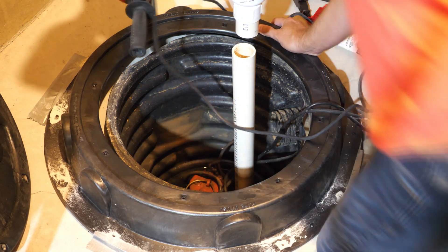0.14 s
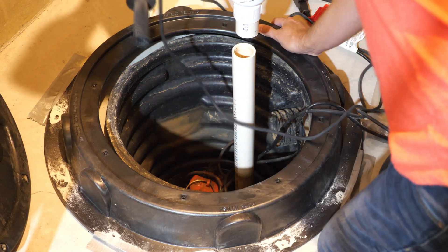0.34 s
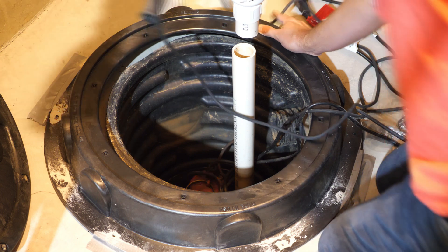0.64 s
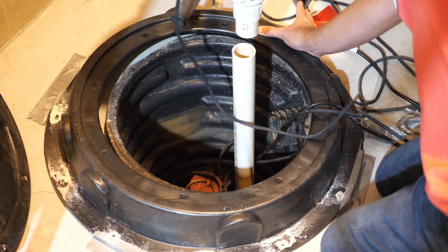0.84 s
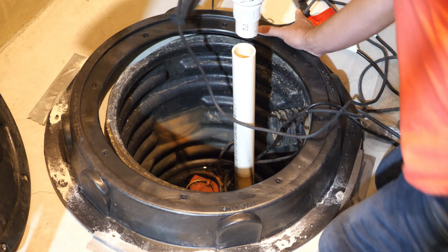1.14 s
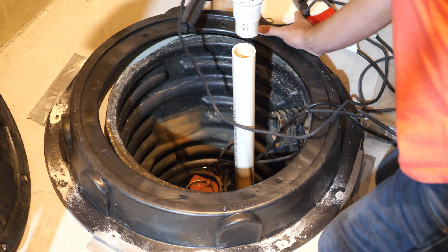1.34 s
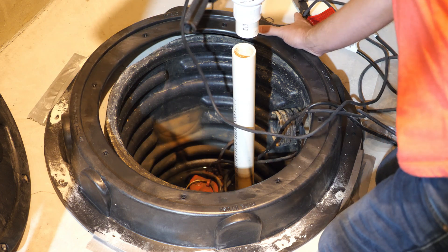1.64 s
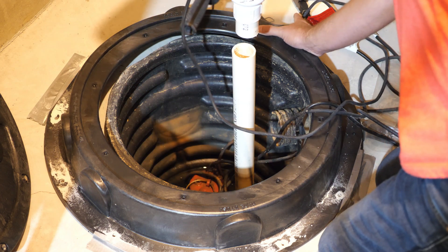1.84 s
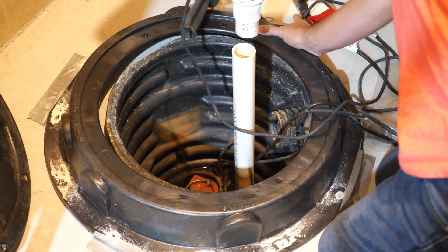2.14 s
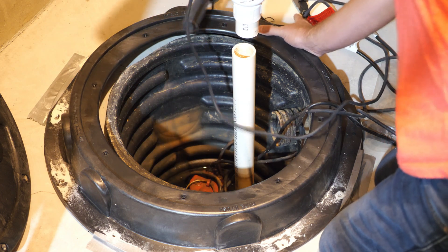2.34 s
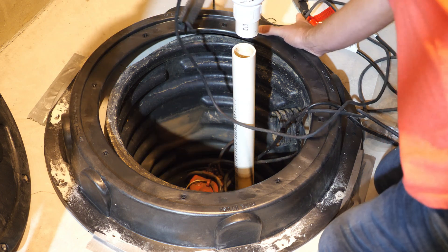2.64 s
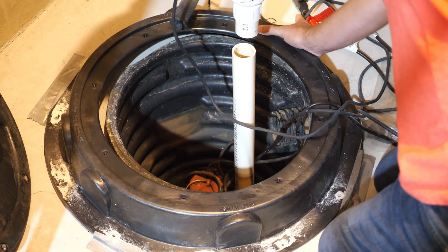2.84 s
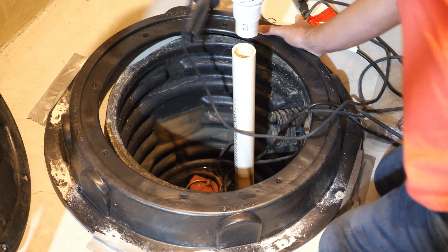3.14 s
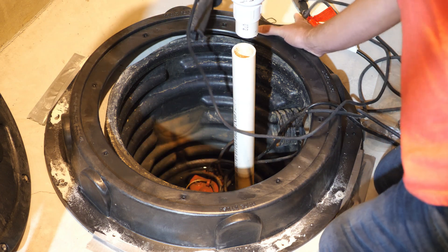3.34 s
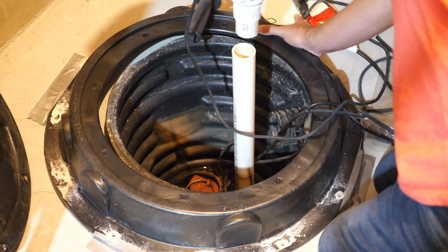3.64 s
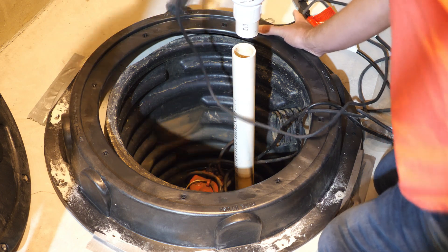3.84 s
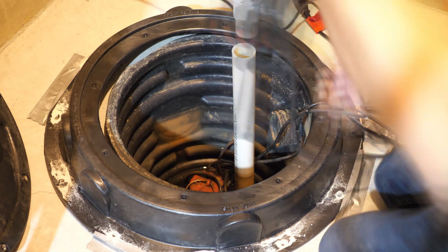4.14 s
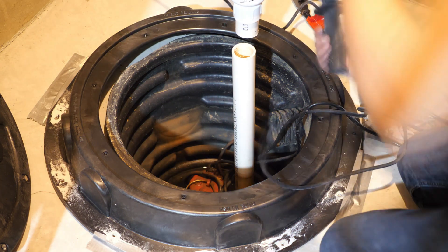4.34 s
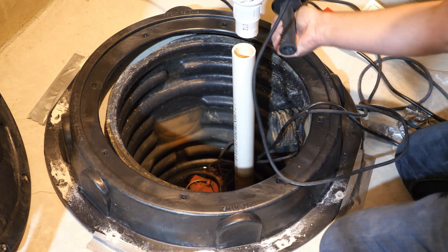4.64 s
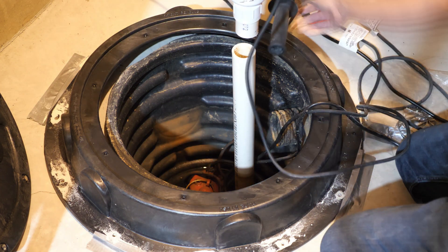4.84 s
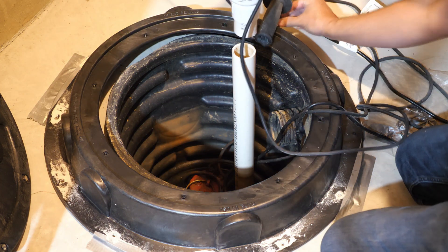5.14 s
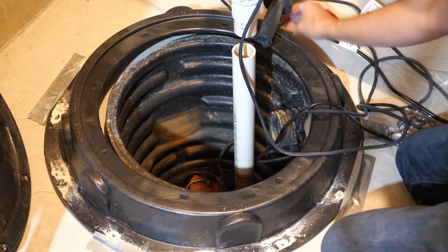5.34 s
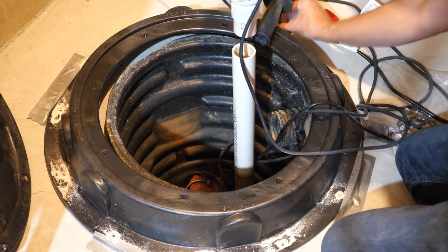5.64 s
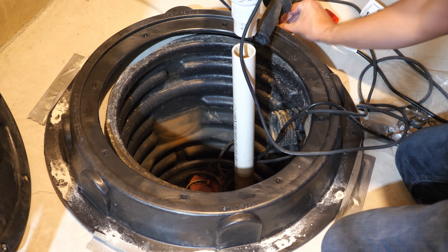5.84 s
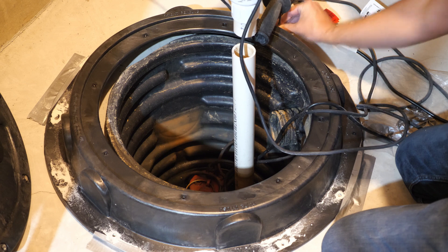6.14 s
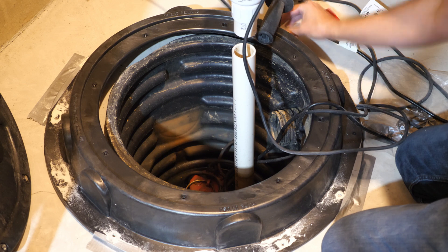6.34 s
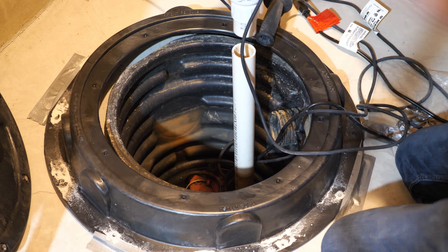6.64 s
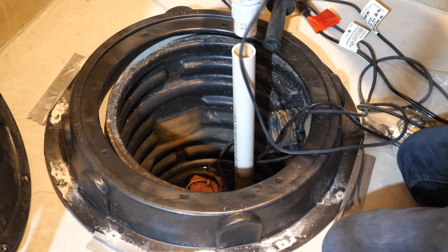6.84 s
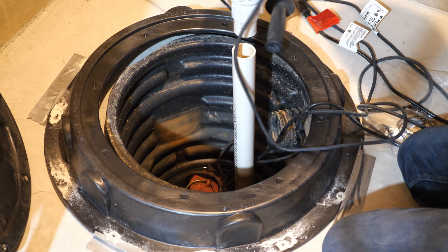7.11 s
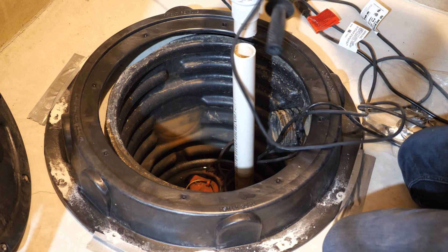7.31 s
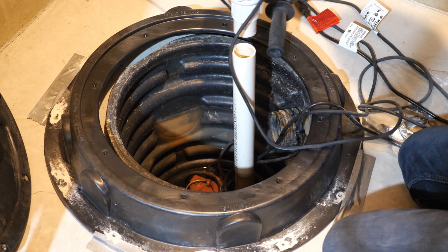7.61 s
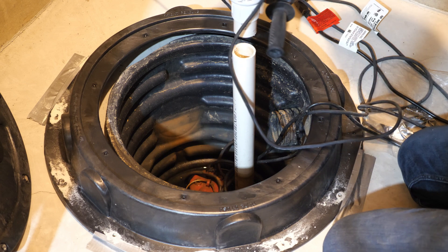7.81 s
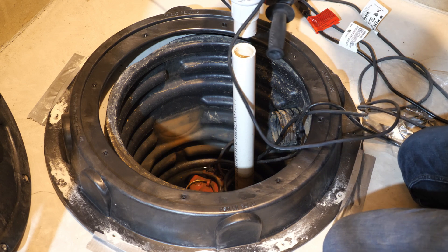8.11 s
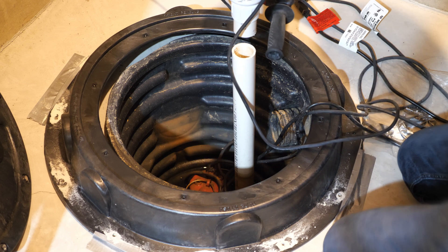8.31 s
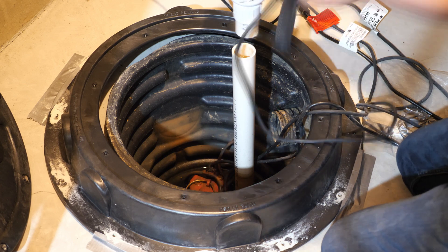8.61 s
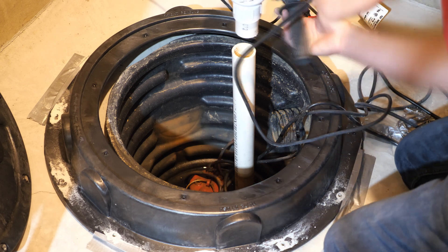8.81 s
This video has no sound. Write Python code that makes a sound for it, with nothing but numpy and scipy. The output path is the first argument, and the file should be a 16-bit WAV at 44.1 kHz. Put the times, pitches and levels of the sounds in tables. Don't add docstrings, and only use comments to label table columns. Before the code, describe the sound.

A hammer drill close by in a small hard basement is already pounding concrete, then lifts, races and whines down. A second steady hammering run follows, then a very brief one ending in a fast free whine. A longer pause holds plastic and cable knocks, rustle, low mains hum and hiss. A final slower, rougher, lower drilling run ends in a coast-down. Close single microphone, short echo.

```python
import sys
import numpy as np
from scipy import signal
from scipy.fft import rfft, irfft, next_fast_len
from scipy.io import wavfile
from scipy.ndimage import uniform_filter1d

SR = 44100
rng = np.random.default_rng(int(sys.argv[2]) if len(sys.argv) > 2 else 0)


def to_wav(sig):
    pcm = np.clip(np.atleast_2d(sig), -1, 1) * 32767
    pcm = np.round(pcm).astype(np.int16)
    wavfile.write(sys.argv[1], SR, pcm.T)


def gain_from_db(level_db):
    decades = np.asarray(level_db, float) / 20
    return 10 ** decades


N = 395577

T = np.arange(N) / SR
LAST_HOLE = T > 5
COAST_HALF_S, CRAWL_HZ = .14, 10

# (time [s], depth [0-1])
DEPTH = [
    (0, 1),
    (.3, 1),
    (1.2, 0),
    (1.9, 0),
    (2.0, 1),
]
# (time [s], peak
# level [dB], pitch [Hz])
STRIKES = [(1.226, -27, 1100), (1.232, -23, 1000), (1.243, -25, 800), (1.251, -28, 900), (6.846, -42, 3350),
           (6.864, -31, 2950), (6.873, -30, 2950), (6.871, -22, 727), (7.002, -29, 894), (7.044, -27, 869),
           (7.066, -28, 560), (7.198, -25, 711), (7.218, -24, 729), (7.241, -27, 800), (7.286, -25, 554),
           (7.305, -26, 643), (7.324, -27, 650), (7.342, -27, 700), (7.361, -28, 800), (7.43, -27, 700),
           (7.442, -27, 800), (7.468, -28, 1300), (7.511, -26, 907), (7.576, -27, 754), (7.766, -31, 662),
           (7.853, -29, 869), (7.953, -27, 856), (7.991, -27, 536), (8.029, -29, 581), (8.132, -31, 703),
           (8.331, -30, 721), (8.387, -31, 864), (8.407, -30, 568), (8.43, -30, 729)]


def unit(x):
    return x / np.sqrt(np.mean(x ** 2) + 1e-20)


def in_time(rows):
    s, *columns = np.transpose(rows)
    return [np.interp(T, s, column) for column in columns]


def at_hz(points, hz):
    point_hz, db = np.array(points)[:, 0], np.array(points)[:, 1]
    return np.interp(np.log(hz + 1e-9), np.log(point_hz), db)


def noise(spectrum, band=(20, 20000)):
    size = next_fast_len(N)
    hz = np.arange(size // 2 + 1) * SR / size
    shape = gain_from_db(at_hz(spectrum, hz))
    inside = np.sum(shape[(hz > band[0]) & (hz < band[1])] ** 2) / len(hz)
    return irfft(rfft(rng.standard_normal(size)) * shape / np.sqrt(inside), size)[:N]


def drift(rate):
    r = np.exp(-80 * np.pi * rate / SR)
    slow = signal.lfilter([1], [1, -2 * r, r * r], rng.standard_normal(N // 40 + 2002))[2000:]
    return np.interp(np.arange(N) / 40, np.arange(len(slow)), unit(slow))


def resonance(x, hz, width_hz):
    r = np.exp(-np.pi * width_hz / SR)
    poles = [1, -2 * r * np.cos(2 * np.pi * hz / SR), r * r]
    return signal.lfilter(np.array([1, 0, -1]) * (1 - r * r) / 2, poles, x)


def burst(turns, sharp):
    size = gain_from_db(1.3 * rng.standard_normal(1000))[turns.astype(int)]
    return unit(uniform_filter1d(size * np.exp(-sharp * (turns % 1)), size=130))


def room(x):
    t60_s, echo_db = 0.19, -7.5
    t = np.arange(9000) / SR
    echoes = rng.standard_normal(9000) * gain_from_db(-60 * t / t60_s) * (t > .002)
    echoes = echoes / np.linalg.norm(echoes)
    wet = x + gain_from_db(echo_db) * signal.fftconvolve(x, echoes)[:N]
    return wet / np.sqrt(1 + gain_from_db(2 * echo_db))


def drill():
    crank_hz, even, motor_db, push_db, coast_s, bite_db = controls()
    turns = np.cumsum(crank_hz) / SR
    load = np.sqrt(np.clip(1 - gain_from_db(2 * (-2.5 - push_db)), 0, 1))
    load_db = 20 * np.log10(load + 1e-3)
    drum_db = motor_db + push_db
    thump_db = drum_db + load_db + np.where(LAST_HOLE, -21, -31 + 12 * even)
    hammer_db = drum_db + load_db

    ground = grit(turns, even, hammer_db)
    drum = blows(turns, crank_hz, even, thump_db, hammer_db + 10 * np.log10(even + 1e-3))
    sizzle = bit(turns, crank_hz, motor_db, load, bite_db)
    machine = motor(turns, crank_hz, load)
    machine += gears(turns, crank_hz, coast_s) + pinion(turns, crank_hz, even, coast_s)
    spin = np.clip(crank_hz / 70, 0, 1) ** 2
    machine += gain_from_db(-36.5 + 1.0 * load) * spin * np.sin(2 * np.pi * turns)
    lumpy_db = 1.8 * np.clip(coast_s / .25 - .5, 0, 1) * drift(25)
    return gain_from_db(motor_db + lumpy_db) * machine + lulls() * (ground + drum) + sizzle


def controls():
    # (time [s], crank speed [Hz], evenness of blows [0-1])
    speeds = [
        [(0, 70.6, .85), (.16, 70.3, .9), (.2, 68.6, .45), (.26, 62, .2), (.31, 73, .1), (.4, 79, .1),
         (.52, 80, .1)],
        [(1.22, 56, .2), (1.34, 71.6, .8), (1.46, 71.3, .88), (1.73, 71.1, .88), (1.82, 71.8, .85),
         (1.89, 71.4, .6), (1.97, 71.6, .85), (2.06, 70.3, .88), (2.14, 71.2, .65), (2.22, 70.9, .88),
         (2.4, 69.8, .8), (2.46, 63, .2), (2.53, 77, .1)],
        [(3.26, 46, .3), (3.36, 56, .3), (3.46, 72, .15), (3.55, 79.5, .1), (3.65, 82.4, .1), (3.86, 82.8, .1)],
        [(6.87, 45.6, .4), (7.09, 46.5, .42), (7.19, 51, .65), (7.37, 54.3, .75), (7.45, 55.2, .6),
         (7.55, 51.3, .45), (7.7, 46.5, .4), (7.8, 49.8, .65), (7.95, 45.4, .7), (8.02, 43.9, .8),
         (8.18, 43.6, .9), (8.38, 44.5, .7), (8.51, 46.2, .6)],
    ]
    # (time [s], motor level [dB], push of the bit on the slab [dB])
    efforts = [
        [(0, -39.5, 1.18), (.165, -39.5, 2.5), (.18, -41, -.5), (.2, -40.5, 1), (.222, -42, 0),
         (.24, -45, -3.5), (.31, -41, -1.5), (.44, -37.5, -2.5), (.52, -39.5, -2.5)],
        [(1.151, -53, -9), (1.222, -51, -4), (1.232, -42, 6), (1.3, -42.5, 5), (1.8, -41.5, 5), (2.288, -45, 5),
         (2.394, -42, 3.5), (2.44, -47.5, -4), (2.53, -42, -2)],
        [(3.194, -55, -1.16), (3.256, -43.5, -3.5), (3.28, -41, 4.5), (3.356, -43, 5), (3.398, -40, -1.5),
         (3.566, -37.5, -2.5), (3.86, -39, -2.5)],
        [(6.82, -57, -9), (6.868, -39, 3.1), (6.93, -41, 2), (7.1, -43, 5), (7.18, -43, 3), (7.22, -43, 5),
         (7.27, -43, 4.5), (7.44, -42.5, 6.5), (7.56, -42, 3), (7.65, -40, 2.5), (7.76, -43.5, 3.5),
         (8.43, -44, 3), (8.47, -43, -1.5), (8.51, -43, -2.5)],
    ]
    # (motor halts [s], fade while coasting [dB/s], extra sizzle of the loaded bit [dB])
    stops = [
        (.922, 43, 3),
        (2.95, 48.5, 12),
        (4.27, 47, 4),
        (8.82, 53.5, 7),
    ]
    spin_up_hz_per_s, coast_bend, halt_bend = 420, 1.7, 8.16
    start_db, start_s = 9, .004
    lift_db_per_s = 22

    out = np.zeros((6, N)) + [[CRAWL_HZ], [0], [-115], [-9], [0], [0]]
    for speed, effort, (halt, fade_db, bite_db) in zip(speeds, efforts, stops):
        (crank_hz, even), (motor_db, push_db) = in_time(speed), in_time(effort)
        start, release = effort[0][0], speed[-1][0]
        coast_s = np.maximum(T - release, 0)
        crank_hz = crank_hz / (1 + (coast_s / COAST_HALF_S) ** coast_bend)
        crank_hz = crank_hz - spin_up_hz_per_s * np.maximum(speed[0][0] - T, 0)
        left = np.clip(1 - (coast_s / (halt - release)) ** halt_bend, 1e-3, 1)
        motor_db = motor_db - fade_db * coast_s + 20 * np.log10(left)
        motor_db = motor_db - start_db * np.exp(-np.maximum(T - start, 0) / start_s) * (start > 0)
        push_db = push_db - lift_db_per_s * coast_s
        run = np.array([np.maximum(crank_hz, CRAWL_HZ), even, motor_db, push_db, coast_s, bite_db + 0 * T])
        on = (T > start) & (T < halt)
        out[:, on] = run[:, on]
    return out


def blows(turns, crank_hz, even, thump_db, drum_db):
    # (multiple of the usual blow rate [1], level [dB])
    shallow_blow = [(1, -28.5), (2, -19), (3, -16), (4, -37.5), (5, -20), (6, -8), (7, -19.5), (8, -5),
                    (9, 0.5), (10, -4), (11, -19), (12, 3.5), (13, -5.5), (14, -6), (15, -3), (16, -9.5),
                    (17, -9.5), (18, -11), (19, -4.5), (20, -10.5), (22, -19), (28, -26)]
    # (multiple of the usual blow rate [1], level [dB])
    deep_blow = [(1, -31.5), (2, -17.5), (3, -14), (4, -32.5), (5, -10), (6, -7), (7, -16.5), (8, -4),
                 (9, 0), (10, -2.5), (11, -5.5), (12, -1.5), (13, -1.5), (14, -6.5), (15, -4), (16, -7.5),
                 (17, -15.5), (18, -7.5), (19, 0), (20, -9), (22, -14), (27, -15), (29, -24)]
    # (frequency [Hz], level [dB])
    far_blow = [(44, -37), (75, -21), (130, -20), (213, -22), (320, -6), (498, -0.5), (630, 1.5),
                (1090, -1), (1290, -5), (1470, 0), (1700, -21.5), (2210, -52.5), (3740, -120)]
    # (frequency [Hz], width [Hz], level [dB])
    slab = [
        (430, 60, -2),
        (550, 55, 3),
        (660, 55, 3),
        (870, 70, 2),
        (1060, 70, 0),
    ]
    usual_hz = 71.3
    shallow, deep = [[(k * usual_hz, db) for k, db in table] for table in (shallow_blow, deep_blow)]

    last, depth = LAST_HOLE[::64], in_time(DEPTH)[0][::64]
    first_hole = np.abs(T[::64] - .14) < .06
    late = 2 * np.pi * (turns + 0.0494 * (1 - even) ** 2 * drift(27.0))
    smear = np.where(LAST_HOLE, 2.8, 2.2)
    sweep = np.where(LAST_HOLE, .05, .2)
    out = np.zeros(N)
    for k in range(1, 37):
        hz = k * crank_hz[::64]
        near_db = (1 - depth) * at_hz(shallow, hz) + depth * at_hz(deep, hz)
        near_db = near_db - 40 * (hz > 1.04 * deep[-1][0]) + 8 * first_hole * (np.abs(hz - 1600) < 150)
        level_db = np.where(last, at_hz(far_blow, hz) - 11.5, near_db)
        low = np.clip((300 - hz) / 60, 0, 1)
        level_db = level_db + low * (thump_db[::64] + 18.5 + 9.5 * last) + (1 - low) * (drum_db[::64] - 0.5)
        waver_db = (.12 * min(k, 16) + 3.0 * (1 - even[::64])) * np.clip(drift(9.0)[::64], -3, 1.2)
        gain = np.interp(np.arange(N), np.arange(len(hz)) * 64, gain_from_db(level_db + waver_db))
        out += gain * np.sin(k * late + rng.random() * smear + k * k * sweep + 0.024 * k * drift(14.0))
    ringing = sum(gain_from_db(db) * resonance(out, hz, width) for hz, width, db in slab)
    return np.where(LAST_HOLE, out + ringing, out)


def lulls():
    share_lost, width_s = .6, .006
    marks, t = np.zeros(N), np.arange(-1000, 1001) / SR
    marks[(np.array(STRIKES)[:, 0] * SR).astype(int) - 60] = 1
    dips = signal.fftconvolve(marks, np.exp(-(t / width_s) ** 2), "same")
    return 1 - share_lost * np.minimum(dips, 1)


def strikes():
    rise_s, decay_s = .0012, .0065
    out, t = np.zeros(N), np.arange(2000) / SR
    fade = (1 - np.exp(-t / rise_s)) * np.exp(-t / decay_s)
    for (s, db, hz), chance in zip(STRIKES, rng.random((len(STRIKES), 3))):
        chance = chance[:, None]
        spread_hz = 170 * np.array([[-1], [0], [1]]) * (.6 + .8 * chance)
        ring = np.mean(np.sin(2 * np.pi * ((hz + spread_hz) * t + .3 * chance)), axis=0)
        first = int(s * SR)
        out[first:first + 2000] += gain_from_db(db + 5) * ring * fade
    return room(out)


def grit(turns, even, hammer_db):
    # (frequency [Hz], level [dB per Hz])
    colour = [(59, -48.5), (100, -20), (281, -24.5), (333, -8), (563, 0.5), (895, 3.5), (1200, -2.5),
              (1560, 0.5), (2560, -18.5), (4000, -10), (5200, -48.5), (8800, -120)]
    return gain_from_db(hammer_db) * (1 - even) ** .58 * room(noise(colour, (400, 1400))) * burst(turns, 0.56)


def bit(turns, crank_hz, motor_db, load, bite_db):
    # (frequency [Hz], level [dB per Hz])
    colour = [
        (8000, -30),
        (10500, -9),
        (12000, -3),
        (14500, 0),
        (15700, -5),
    ]
    # (time [s], level [dB])
    singing = [(0, 0), (6.8, 0), (6.86, 2), (7.0, 3), (7.08, -8), (7.45, -8), (7.52, -1), (7.7, 1),
               (7.78, -7), (7.9, -3), (8.08, -7), (8.15, 0), (8.28, 0), (8.33, -7)]
    sizzle_db = -57 + 1.4 * (motor_db + 38) + load * bite_db
    sizzle_db = sizzle_db + 8.5 * np.exp(-((T - 6.93) / .04) ** 2)
    hiss = .7 * noise(colour) * burst(turns, .3) * gain_from_db(1.5 * load * drift(7))
    struck = rng.standard_normal(N) * burst(turns, 1.6)
    ring_db = -5 + in_time(singing)[0] + np.where(LAST_HOLE, 1.2, 3.5) * drift(8.0)
    ringing = unit(resonance(struck, 13250, 110)) * gain_from_db(ring_db)
    undamped = 1 - .6 * in_time(DEPTH)[0] * (crank_hz > 60)
    return gain_from_db(sizzle_db) * (hiss + load * undamped * ringing)


def motor(turns, crank_hz, load):
    # (frequency [Hz], level [dB per Hz])
    colour = [(35, -45), (60, -31.5), (132, -44), (385, -28.5), (443, -25.5), (572, -12.5), (689, -12.5),
              (756, -7.5), (850, -9), (1520, -7), (1750, -8), (2850, -5), (4860, -13.5), (7740, -18),
              (15500, -33.5)]
    # (frequency [Hz], width [Hz], level [dB])
    modes = [(570, 26, -22), (766, 32, -27), (1084, 40, -16), (1333.2, 22, -14), (1510, 60, -7),
             (1923.4, 50, -15), (2381, 50, -20.5), (2913, 110, -11.5), (3350, 90, -14.5),
             (3681, 350, -12.5), (4082, 27, -27)]
    air = rng.standard_normal(N)
    casing = sum(gain_from_db(db + 1.7 * drift(8.9)) * unit(resonance(air, hz, width)) for hz, width, db in modes)
    casing += gain_from_db(-8 + 2.5 * drift(6.0)) * LAST_HOLE * unit(resonance(air, 1520, 26))
    rush = noise(colour, (1800, 9000)) * gain_from_db(.5 * drift(7.9))
    dull = signal.sosfilt(signal.butter(2, 4300, fs=SR, output="sos"), rush)
    bright = np.clip(crank_hz / 60, .55, 1)
    free = 1 - .5 * load * bright ** 4
    shaken = 1 + load * (burst(turns, .2) ** .6 - 1)
    casing = free * np.clip(crank_hz / 42, .55, 1) * casing
    return shaken * room(dull + bright * (rush - dull) + casing)


def gears(turns, crank_hz, coast_s):
    # (multiple of crank speed [1], level [dB])
    lines = [(9.42, -13), (15, -19), (18, -11), (20, -17), (30, -22), (94.1, -21), (103.6, -27), (113, -29)]
    # (crank speed [Hz], level [dB])
    whine = [
        (30, -18),
        (45, -13),
        (65, -13),
        (71, -9),
        (77, -9),
        (80, -3),
        (82.5, 0),
    ]
    whine_db = at_hz(whine, crank_hz) - 8 * np.clip(coast_s / COAST_HALF_S, 0, 1)
    tones = sum(gain_from_db(db + 3.0 * drift(14.0)) * np.sin(2 * np.pi * k * turns + .009 * k * drift(30.0))
                for k, db in lines)
    return gain_from_db(whine_db + 10.0) * np.clip(crank_hz / 70, 0, 1) ** 2 * tones


def pinion(turns, crank_hz, even, coast_s):
    # (frequency [Hz], level [dB])
    body = [
        (1200, -34),
        (1500, -8),
        (1750, -10),
        (2000, -7),
        (2350, -11),
        (2800, -5),
        (3400, -10),
        (3900, -30),
    ]
    teeth = 66.8
    coasting = np.clip(coast_s / COAST_HALF_S, 0, 1)
    last_db = 29 * (np.clip(even, .56 * (T < 7.28), .63) - .27)
    held_db = np.where(LAST_HOLE, last_db, -5 * (crank_hz < 65))
    level_db = -10 + (1 - coasting) * held_db + coasting * (11.5 + 2 * LAST_HOLE)
    level_db = level_db - 60 * np.maximum(coast_s - np.where(LAST_HOLE, 1.2, 1.8) * COAST_HALF_S, 0)
    level_db = level_db + at_hz(body, teeth * crank_hz) + 3.5 + 2.8 * drift(45.0)
    return gain_from_db(level_db) * np.sin(2 * np.pi * teeth * turns + 1.0 * drift(40.0))


def knocks():
    # (time [s], peak level [dB], pitch
    # [Hz], edge against body [dB], contact [s])
    bumps = [(0.986, -56, 519, -29.5, 0.03), (1.024, -59, 1050, -30, .014), (1.112, -62, 950, -20, .014),
             (3.148, -63, 900, -8, .014), (3.183, -58, 1200, -8, .012), (1.077, -55, 597, -27.5, 0.0118),
             (1.126, -50, 1035, -32, 0.0127), (2.925, -56, 2770, -23, 0.0124),
             (3.16, -51, 1100, -14, 0.022), (4.303, -52, 550, -15, 0.028), (4.339, -51, 469, -26, 0.0278),
             (4.684, -40, 560, -26, 0.0335), (4.738, -59, 1600, -30, .018), (4.744, -50, 445, -22, 0.0185),
             (4.667, -60, 700, -30, .02), (4.782, -58, 1700, -30, .03), (4.354, -56, 1500, -20, .012),
             (1.015, -76, 3700, -30, .02), (.972, -68, 700, -15, .02), (4.795, -50, 550, -22, 0.0122),
             (4.877, -44, 930, -16, 0.0212), (4.892, -54.5, 960, -6.5, 0.0098),
             (4.924, -44.5, 1244, -17, 0.0226), (5.01, -59, 1500, -14, .04), (5.069, -57, 590, -13.5, 0.03),
             (5.099, -58, 1250, -16, .025), (5.18, -54, 250, -30, .02), (5.16, -47.5, 830, -22, 0.0302),
             (5.764, -51.5, 686, -19, 0.0304), (5.914, -58.5, 408, -25.5, 0.021),
             (2.73, -59, 190, -39, .06), (2.8, -59, 300, -41, 0.053), (8.51, -57, 170, -40, 0.073),
             (8.57, -57, 170, -39.5, .05), (6.757, -61, 900, -4, .045), (6.862, -29, 900, -14, .022)]
    # (time [s], peak level [dB], pitch [Hz], papery edge level [dB])
    ticks = [(3.055, -71, 1500, -77), (3.083, -62, 980, -77), (4.522, -68, 1500, -80),
             (4.829, -66, 4000, -77), (5.243, -60, 1990, -80), (5.363, -73, 404, -77),
             (6.036, -77, 3000, -90), (6.186, -74, 1000, -88), (6.348, -64, 553, -79),
             (6.618, -74, 4200, -84), (6.686, -69, 1060, -84), (8.879, -75, 3325, -82),
             (8.935, -75, 3350, -82)]
    # (frequency [Hz], width [Hz], level [dB])
    shell_modes = [
        (1520, 140, 0),
        (2050, 260, 0),
        (2890, 200, -2),
        (3400, 200, -3),
        (4050, 260, -9),
    ]
    out, t = np.zeros(N + 4000), np.arange(4000) / SR
    rows = bumps + [(s, db, hz, edge_db - db, .025) for s, db, hz, edge_db in ticks]
    draws = rng.standard_normal((len(rows), 2, 4000))
    edge_band = signal.butter(2, [1300, 4500], "band", fs=SR, output="sos")
    for (s, db, hz, edge_db, contact), (draw, grain) in zip(rows, draws):
        press = 1 - np.exp(-(t / (.001 + .16 * contact)) ** 2)
        touch = press * np.exp(-(t / contact) ** 4 - t / 0.1)
        hollow = resonance(resonance(draw, hz, .4 * hz), hz, .9 * hz)
        thud_band = signal.butter(4, [200, 2.3 * hz], "band", fs=SR, output="sos")
        body = unit(hollow) + 0.8 * unit(signal.sosfilt(thud_band, grain))
        body = body / np.sqrt(uniform_filter1d(body ** 2, size=350))
        shell = sum(gain_from_db(ring_db + 2.5 * g) * resonance(draw, f, w) for (f, w, ring_db), g in zip(shell_modes, grain))
        paper = .2 * unit(signal.sosfilt(edge_band, grain))
        edge = unit(unit(signal.sosfilt(edge_band, shell)) + paper) * gain_from_db(edge_db + 9.0)
        first = int((s - .002) * SR)
        out[first:first + 4000] += gain_from_db(db - 7) * touch * (body + edge)
    return 0.322 * out[:N] + 0.515 * room(out[:N])


def rustle():
    # (time [s], peak level [dB], swell and fade [s per 10 dB])
    moves = [(1.0, -74, .08), (1.14, -75, 0.12), (3.08, -75, .08), (3.18, -71.5, 0.06),
             (4.27, -64.5, 0.1037), (4.44, -70, .1), (4.57, -68, 0.2), (5.02, -59, 0.12), (5.1, -57.5, .16),
             (5.38, -68, .06), (5.9, -85, 1.5), (6.66, -79, 0.1), (6.81, -61, 0.0848), (8.97, -77, 0.45)]
    # (frequency [Hz], level [dB per Hz])
    colour = [(240, -32.5), (400, -12.5), (452, -1.5), (495, -13.5), (593, -10.5), (1010, -11.5),
              (1400, -9), (1530, -2), (1690, -11.5), (5860, -23.5), (15000, -36)]
    level_db = np.max([db - 10 * np.abs(T - s) / fade for s, db, fade in moves], axis=0)
    return gain_from_db(level_db - 11.5 + 3.0 * drift(40.0)) * noise(colour, (500, 6000))


def basement(loud):
    # (frequency [Hz], level [dB])
    hum_lines = [
        (120.6, -62.5),
        (358.8, -79),
        (241.5, -95),
    ]
    # (frequency [Hz], level [dB per Hz])
    hiss = [(20, -10), (40, -12), (80, -15.5), (170, -23.5), (400, -27), (1700, -41.5), (6000, -48.5),
            (12000, -49), (15000, -71)]
    quiet_db, recovery_db_per_s = -57, 22
    hum = sum(gain_from_db(db + 3) * np.sin(2 * np.pi * hz * T) for hz, db in hum_lines)
    loud_db = 10 * np.log10(uniform_filter1d(loud ** 2, size=2000) + 1e-12)
    over_db = np.maximum(loud_db - quiet_db, 0)
    recovery_db = recovery_db_per_s * T
    held_db = np.maximum.accumulate(over_db + recovery_db) - recovery_db
    gain = gain_from_db(-uniform_filter1d(held_db, size=3000))
    return gain * (hum + gain_from_db(-83) * noise(hiss, (400, 15000)))


def scene():
    tool = drill() + strikes()
    mono = tool + knocks() + rustle() + basement(tool)
    return np.array([mono, mono])


def band_limit(x):
    return signal.sosfilt(signal.butter(12, 15690, fs=SR, output="sos"), x)


def record(dry):
    heard = dry - .5 * resonance(dry, 10300, 900)
    return band_limit(heard)


dry = scene()
out = record(dry)
to_wav(out)
```